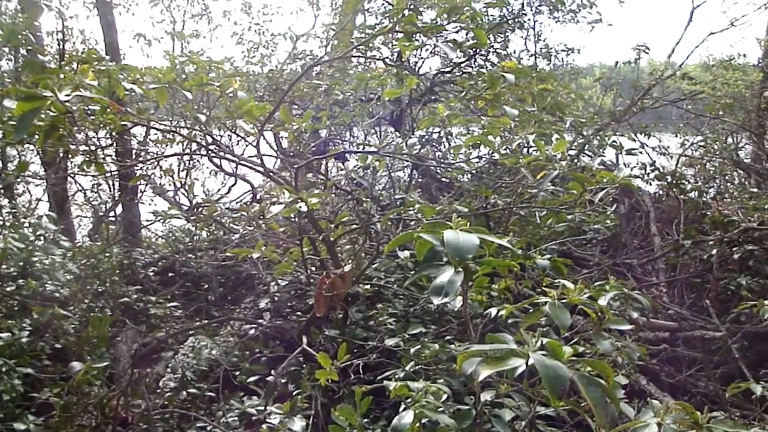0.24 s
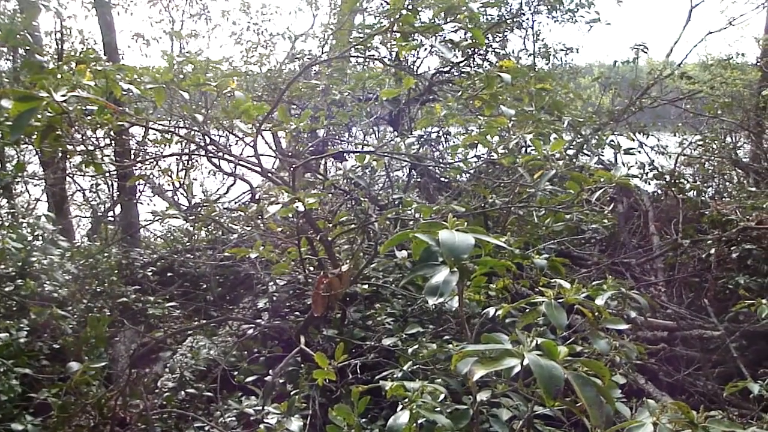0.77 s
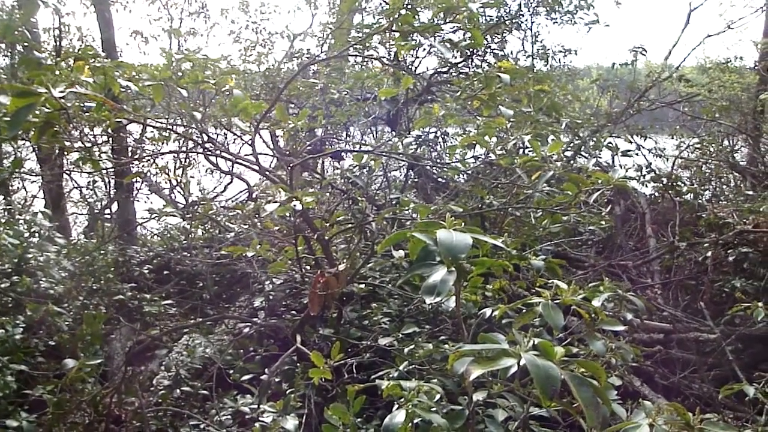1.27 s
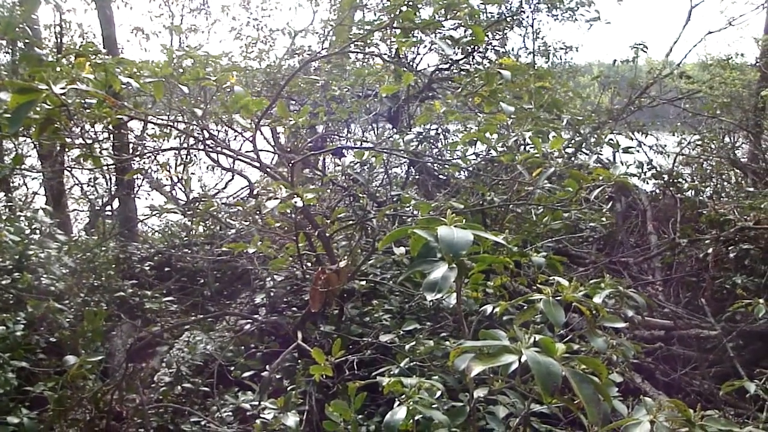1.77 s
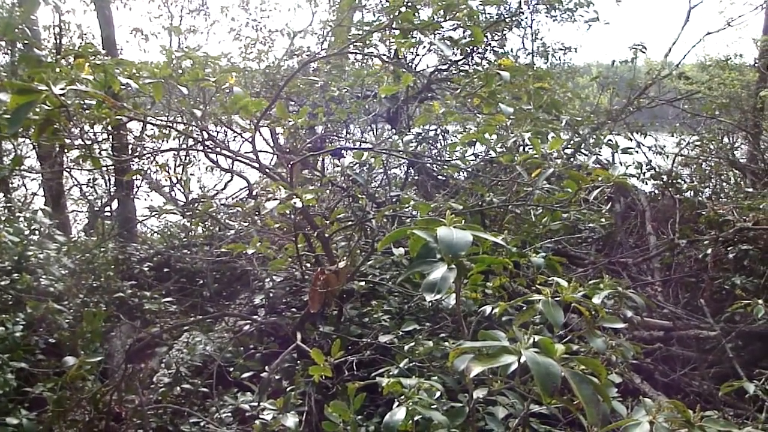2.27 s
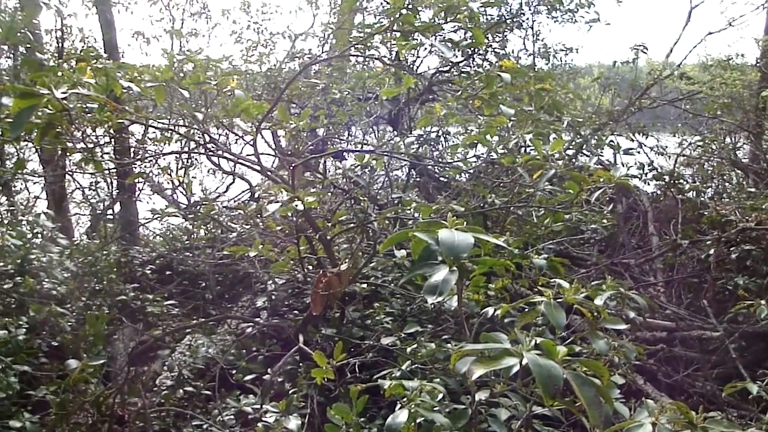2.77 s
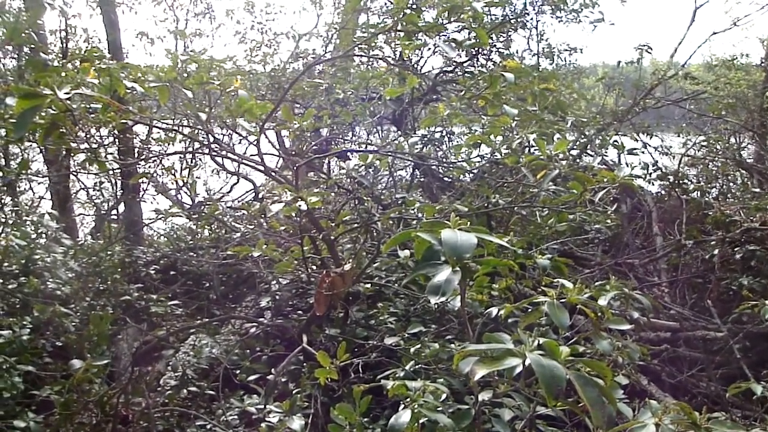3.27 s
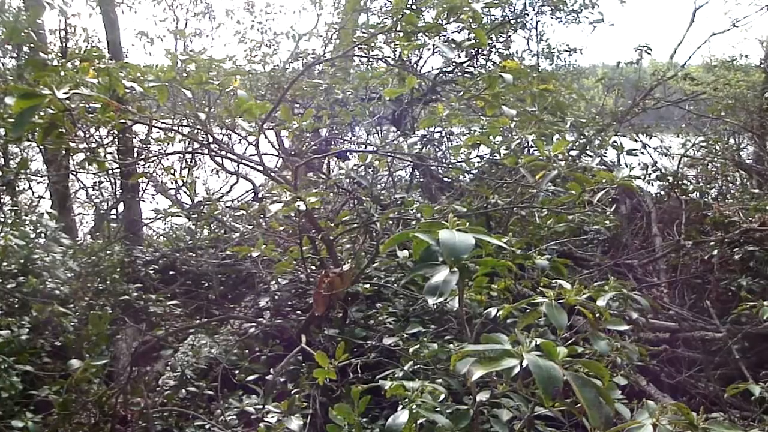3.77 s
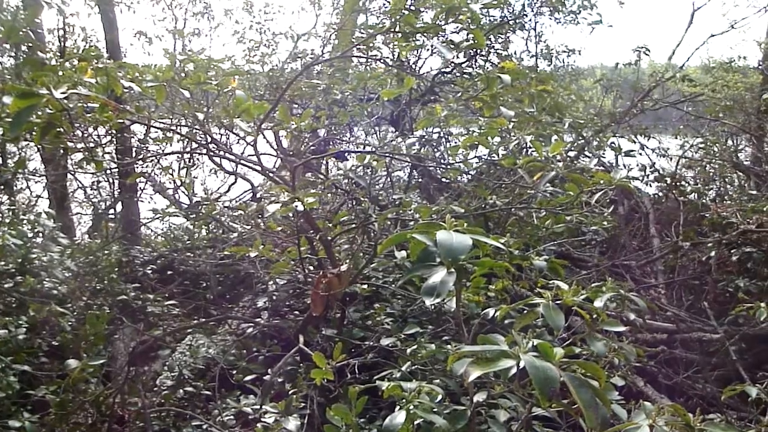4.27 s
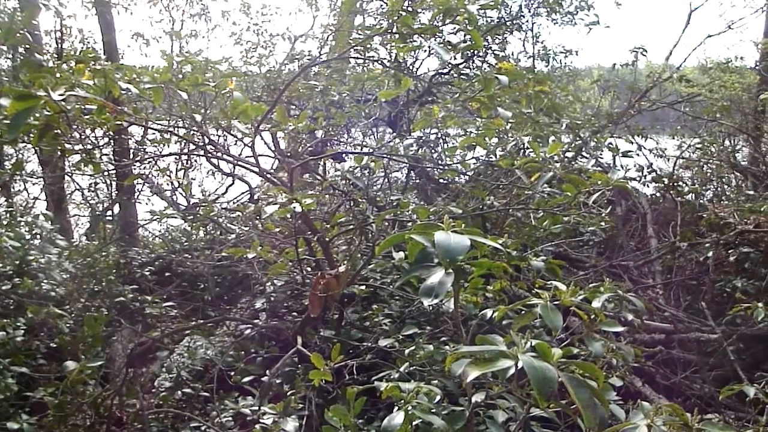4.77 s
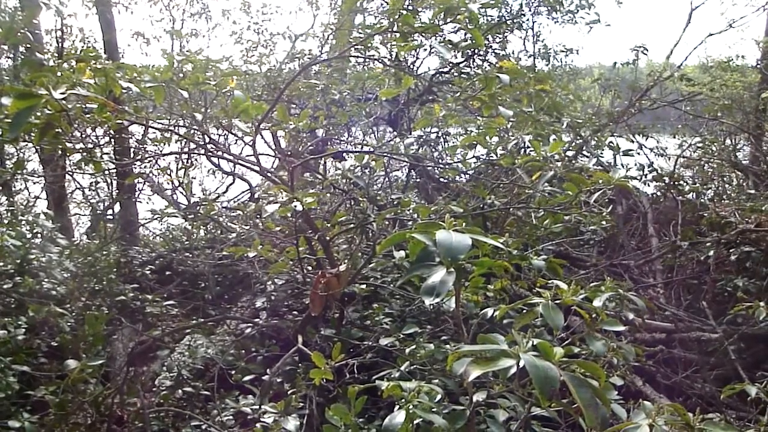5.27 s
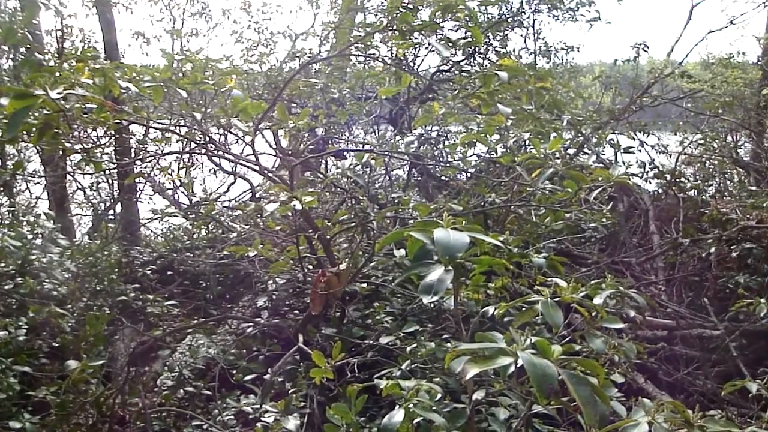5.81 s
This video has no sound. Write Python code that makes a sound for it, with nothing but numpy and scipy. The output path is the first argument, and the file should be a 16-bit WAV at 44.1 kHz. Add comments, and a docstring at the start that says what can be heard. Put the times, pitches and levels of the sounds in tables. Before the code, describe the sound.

A soft outdoor hush sits behind a high-pitched chorus of tree frogs calling from the woods and across a pond. One blurred trill fades at the very start, then a close frog takes over with a loud, sustained, rapidly pulsing trill. Near the midpoint a second, slightly higher and less even frog joins in. The background callers thin out later. A single microphone on the bank picks up light echoes from the trunks.

```python
"""A male tree frog trills close to the microphone, at the wooded edge of a pond.
Each trill is a train of short vocal-sac pulses; his come some 45 a second and slow as he goes on.
A higher male joins from along the bank; others call from deeper in the trees and across the water.
Trunks echo and smear the pulses. One microphone takes it all in mono, over a soft hush of air
and a little distant rumble."""
import sys
import numpy as np
from scipy import signal
from scipy.fft import rfft, irfft
from scipy.io import wavfile

SR = 44100
rng = np.random.default_rng(int(sys.argv[2]) if len(sys.argv) > 2 else 0)


def wav_out(sig):
    """Save sig, one row per channel (or a flat mono array), as 16-bit PCM at SR to the path in sys.argv[1]."""
    wavfile.write(sys.argv[1], SR, np.round(np.clip(np.atleast_2d(sig).T, -1, 1) * 32767).astype(np.int16))


N = 266540
TIME = np.arange(N) / SR

# colour of the air's hush: frequency_hz, relative_db
AIR_SPECTRUM = [(20, -20), (40, -20), (60, -8), (110, -5), (180, -1), (320, -1), (600, -2), (1100, -5),
                (2300, -9.5), (4200, -13), (6500, -16), (9000, -17.5), (11000, -20)]
# colour of the distant rumble: frequency_hz, relative_db
RUMBLE_SPECTRUM = [(60, -28), (140, -13), (178, 2), (225, -1.5), (300, -5), (420, -8), (520, -26),
                   (2000, -68)]
# swells of that rumble: peak_s, rise_s, fall_s, level_db
RUMBLE_SWELLS = [(0, .1, .17, -63), (2.8, 0.23, 0.35, -62), (3.14, 0.056, .06, -66), (5.05, .11, 0.47, -58)]
# frogs across the pond: start_s, end_s, pitch_hz, pulses_per_s, relative_db
FAR_TRILLS = [(.01, 5.9, 1373, 47, -68.5), (.01, 1.1, 1438, 57, -61.5), (.01, 5.2, 1664, 47, -63.5),
              (.01, 1.1, 1826, 44, -66.5), (.01, 6, 1484, 54, -65)]
# large males in the trees: start_s, end_s, first_pulses_per_s, last_pulses_per_s, pitch_hz, level_db
LOW_TRILLS = [(.012, .45, 55.6, 55.5, 1442, -56.5), (.012, 4, 57, 61, 1534, -52),
              (.98, 4.12, 50, 41, 1472, -52.5)]
# stronger pulses that stand out of the fading trill: time_s, pitch_hz, level_db
CLEAR_PULSES = [(.094, 1680, -44), (.125, 1730, -44), (.147, 1730, -42), (.203, 1732, -40.5),
                (.261, 1702, -42.5)]
# the higher male scoops up, overshoots a little and settles: time_s, pitch_hz
HIGH_PITCH = [(2.7, 1802), (2.95, 1866), (3.2, 1901), (3.55, 1913), (4.3, 1906), (6.04, 1908)]
# trunk reflections from his place along the bank: delay_s, relative_db
HIGH_ECHOES = [(.0068, -12), (.01485, -11), (.02721, -13), (.03676, -17), (.07644, -15)]
# the near male's tempo, first pulse to last: time_s, pulses_per_s
NEAR_TEMPO = [(.986, 52.6), (1.3, 50.88), (1.7, 48.16), (2.1, 46), (2.6, 46.16), (3.1, 44.62), (3.7, 44.4),
              (4.2, 42.92), (4.8, 43.48), (5.2, 43.23), (5.65, 42.79), (5.92, 37.22)]
# he scoops up, overshoots, settles and slowly sags: time_s, pitch_hz
NEAR_PITCH = [(.98, 1573), (1.12, 1623), (1.3, 1653), (1.68, 1683), (1.8, 1647), (5.92, 1612)]
# trunk reflections from his place by the microphone: delay_s, relative_db
NEAR_ECHOES = [(.01181, -10.5), (.02937, -12.5), (.04392, -15.5), (.0583, -16), (.06567, -19),
               (.09454, -19.5)]


def undb(db):
    """Decibels to gain."""
    return 10 ** (np.asarray(db) / 20)


def curve(table, at):
    """Each column of a table of timed rows, read at the given times."""
    times, *columns = np.transpose(table)
    return [np.interp(at, times, column) for column in columns]


def lag(at, start_s, settle_s):
    """What is still missing from a steady call: 1 at its start, dying away to 0."""
    return np.exp(-np.maximum(at - start_s, 0) / settle_s)


def noise(spectrum):
    """Noise of rms 1, coloured by rows of frequency_hz, relative_db."""
    hz, db = np.transpose(spectrum)
    bins_hz = np.maximum(np.fft.rfftfreq(N, 1 / SR), 1)
    colour = undb(np.interp(np.log(bins_hz), np.log(hz), db))
    x = irfft(rfft(rng.standard_normal(N)) * colour, N)
    return x / x.std()


def air(hush_db=-54):
    """The bed of the place: a steady hush, and a distant rumble that swells now and then."""
    hush = noise(AIR_SPECTRUM) * undb(hush_db)
    swells = sum(undb(db) * np.exp(-((TIME - peak) / np.where(TIME < peak, rise, fall)) ** 2)
                 for peak, rise, fall, db in RUMBLE_SWELLS)
    return hush + noise(RUMBLE_SPECTRUM) * swells


def woods(x, wet_db, t60_s, echoes=()):
    """Frog to microphone: direct sound, single reflections, and a tail scattered by trunks and leaves."""
    age = TIME[:SR // 2]
    decay = np.exp(-np.log(1000) * age / t60_s)
    response = rng.standard_normal(len(age)) * decay * (age > .005)
    response *= undb(wet_db) / np.linalg.norm(response)
    response[0] += 1  # the direct path
    for delay_s, db in echoes:
        response[round(delay_s * SR)] += undb(db)
    return signal.fftconvolve(x, response)[:N]


def trill(tempo, voice, scatter_db=1, jitter_s=.0004, waver=.0037):
    """Rows of time_s, pitch_hz, level_db: a pulse for each squeeze of the flanks, no two quite alike."""
    clock = TIME[(TIME >= tempo[0][0]) & (TIME <= tempo[-1][0])]
    squeezes = np.cumsum(curve(tempo, clock)[0]) / SR
    times = np.interp(np.arange(squeezes[-1]), squeezes, clock)
    hz, db = curve(voice, times)
    late, sharp, loud = rng.standard_normal((len(times), 3)).T
    return np.column_stack([times + jitter_s * late, hz * (1 + waver * sharp), db + scatter_db * loud])


def pulses(rows, length_s, droop, second_db=-40, third_db=-40, skew=.64, taper=1.12, reed_power=1):
    """Vocal-sac pulses: each a near sine that swells, then sags and grows reedy as the pressure drops."""
    out = np.zeros(N)
    crest = .5 ** (1 / skew)  # share of the pulse that has passed at its loudest
    for (peak_s, hz, db), start_phase in zip(rows, rng.uniform(0, 2 * np.pi, len(rows))):
        span = slice(max(int((peak_s - length_s) * SR), 0), int((peak_s + length_s) * SR))
        progress = np.clip((TIME[span] - peak_s) / length_s + crest, 0, 1)
        swell = np.abs(np.sin(np.pi * progress ** skew)) ** taper
        sag = droop * (progress ** 4 - crest ** 4)
        phase = start_phase + 2 * np.pi * np.cumsum(hz * (1 - sag)) / SR
        overtones = undb(second_db) * np.sin(2 * phase) + undb(third_db) * np.sin(3 * phase)
        reedy = (progress / crest) ** reed_power
        out[span] += 2 * undb(db) * swell * (np.sin(phase) + reedy * overtones)
    return out


def far_frogs():
    """Trills from across the pond, reaching the microphone mostly as reverberation."""
    calls = [trill([(start, rate), (end, rate)], [(start, hz, db)], scatter_db=4.5)
             for start, end, hz, rate, db in FAR_TRILLS]
    chorus = pulses(np.vstack(calls), length_s=.0145, droop=.016)
    return undb(-8.5) * woods(chorus, wet_db=11.5, t60_s=.39)


def low_frogs():
    """Large males deeper in the trees, half blurred, each holding or gradually shifting his tempo."""
    calls = [trill([(start, first), (end, last)], [(start, hz, db)], scatter_db=2.5)
             for start, end, first, last, hz, db in LOW_TRILLS]
    chorus = pulses(np.vstack(calls), length_s=.017, droop=.011)
    return woods(chorus, wet_db=-4, t60_s=.35)


def fading_frog(end_s=.37, pulses_per_s=53, pitch_hz=1772, sag_hz=50, level_db=-48.5, fade_db=7):
    """A blurred trill sags and runs out in the opening moments, with a few stronger, clearer pulses."""
    tempo = [(.01, pulses_per_s), (end_s, pulses_per_s)]
    voice = [(0, pitch_hz, level_db), (end_s, pitch_hz - sag_hz, level_db - fade_db)]
    blurred = woods(pulses(trill(tempo, voice), length_s=.015, droop=.02), wet_db=1, t60_s=.45)
    clear = woods(pulses(CLEAR_PULSES, length_s=.014, droop=.02), wet_db=-4, t60_s=.4)
    return blurred + clear


def high_frog(start_s=2.698, end_s=6.04, steady_per_s=41.93, rush_per_s=5.76, level_db=-44.5):
    """A smaller male further along the bank, higher and less even, who starts in a rush and eases off."""
    clock = np.arange(start_s, end_s, 1 / SR)
    tempo = np.column_stack([clock, steady_per_s + rush_per_s * lag(clock, start_s, settle_s=1.2)])
    slack_db = 11.5 * lag(clock, start_s, settle_s=.3)  # his level rises as the vocal sac fills
    falter_db = 11 * np.exp(-((clock - 4.62) / .027) ** 2)  # he falters once, for a few pulses
    voice = np.column_stack([clock, curve(HIGH_PITCH, clock)[0], level_db - slack_db - falter_db])
    rows = trill(tempo, voice, scatter_db=2.1, jitter_s=.0007, waver=.0075)
    call = pulses(rows, length_s=.0155, droop=.046, skew=.78, taper=1.5,
                  second_db=-35.5, third_db=-55, reed_power=3)
    return woods(call, wet_db=-13, t60_s=.3, echoes=HIGH_ECHOES)


def near_frog(level_db=-35.2, swell_db=6.5):
    """The male closest to the microphone swells quickly and holds: separate pulses with faint echoes."""
    slack_db = swell_db * lag(TIME, start_s=NEAR_TEMPO[0][0], settle_s=.27)
    voice = np.column_stack([TIME, curve(NEAR_PITCH, TIME)[0], level_db - slack_db])
    rows = trill(NEAR_TEMPO, voice, scatter_db=1.25, jitter_s=.0003, waver=.002)
    call = pulses(rows, length_s=.013, droop=.038, skew=.84, taper=1.2,
                  second_db=-46, third_db=-37.5, reed_power=.7)
    return woods(call, wet_db=-13.5, t60_s=.6, echoes=NEAR_ECHOES)


def scene():
    """All the frogs and the air at one microphone on the bank."""
    return (near_frog() + high_frog() + low_frogs() + fading_frog() + far_frogs() + air())[None]


def record(dry):
    """The recorder cuts the top steeply."""
    top_hz = 10900
    return signal.sosfilt(signal.ellip(12, .2, 70, top_hz, fs=SR, output="sos"), dry)


dry = scene()
out = record(dry)
wav_out(out)
```